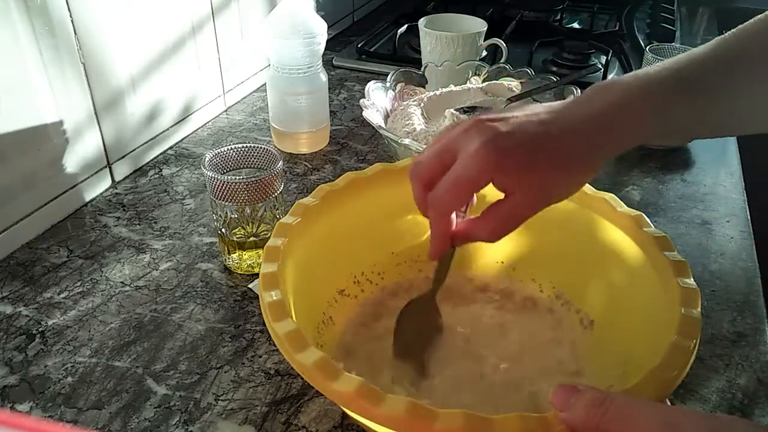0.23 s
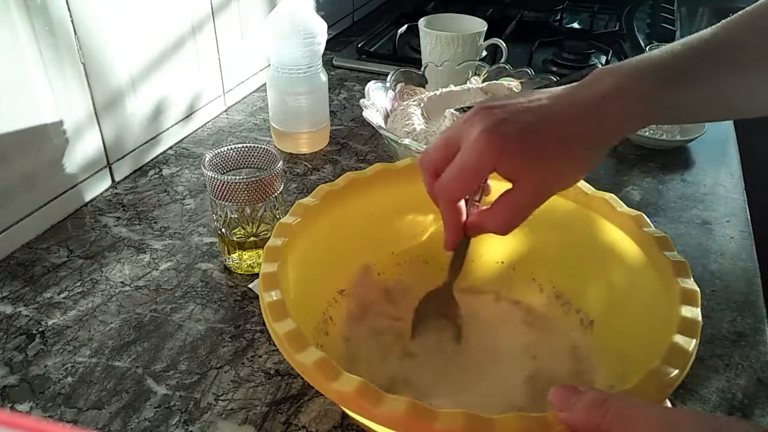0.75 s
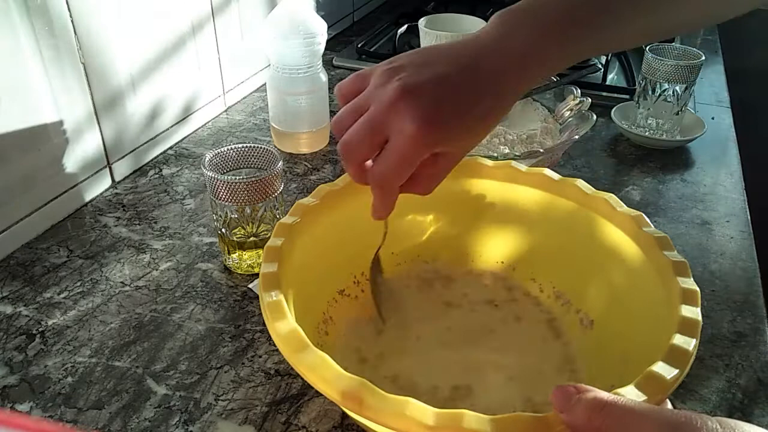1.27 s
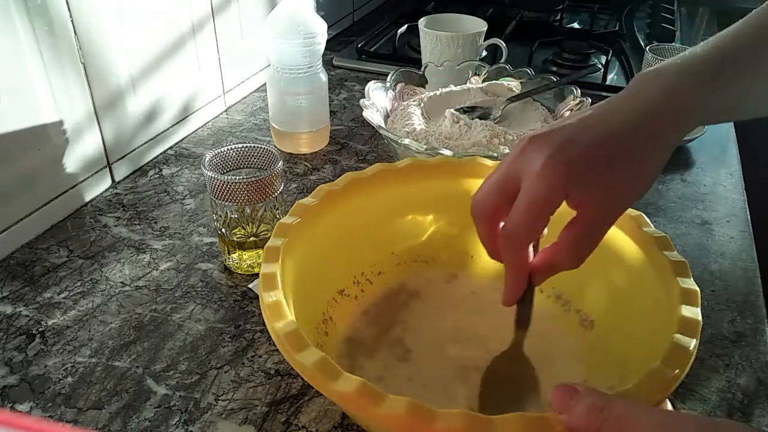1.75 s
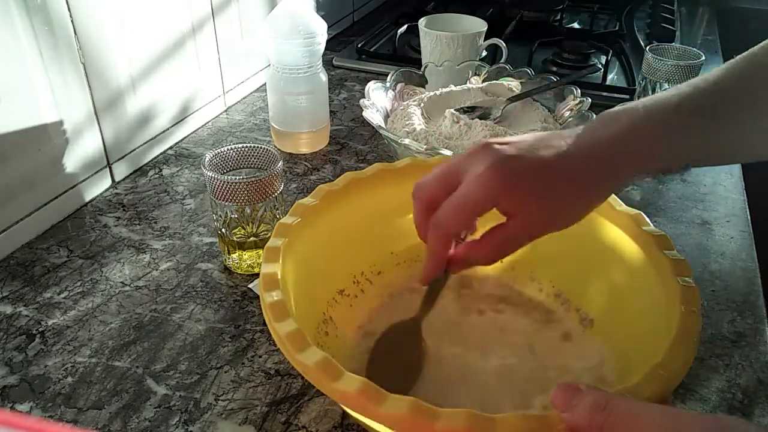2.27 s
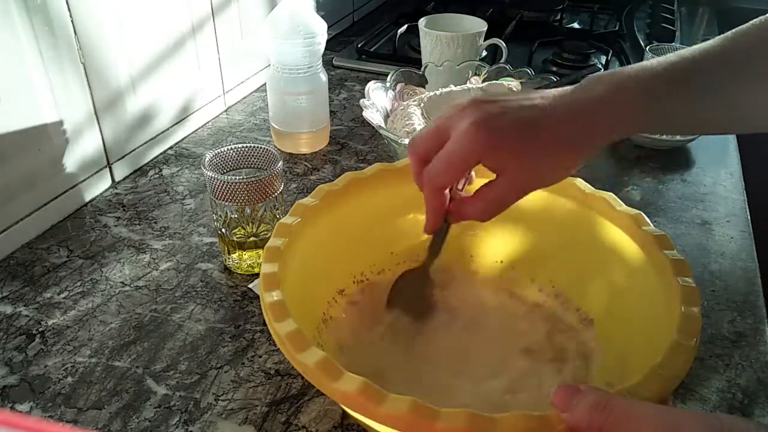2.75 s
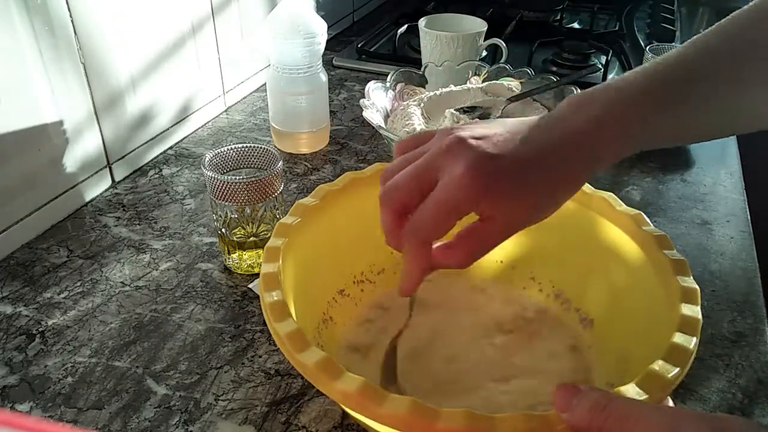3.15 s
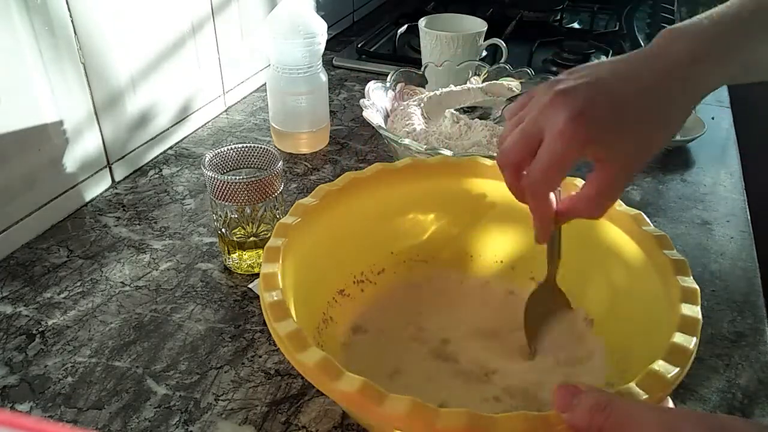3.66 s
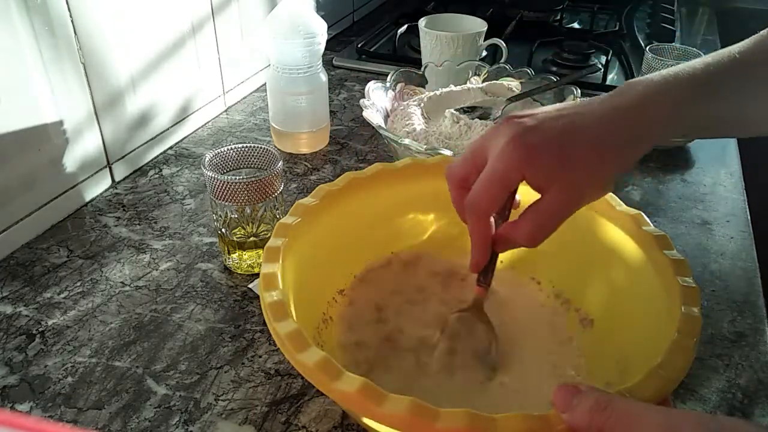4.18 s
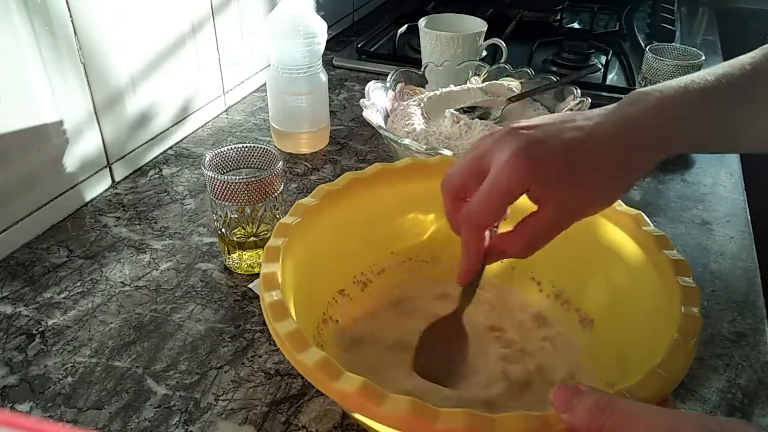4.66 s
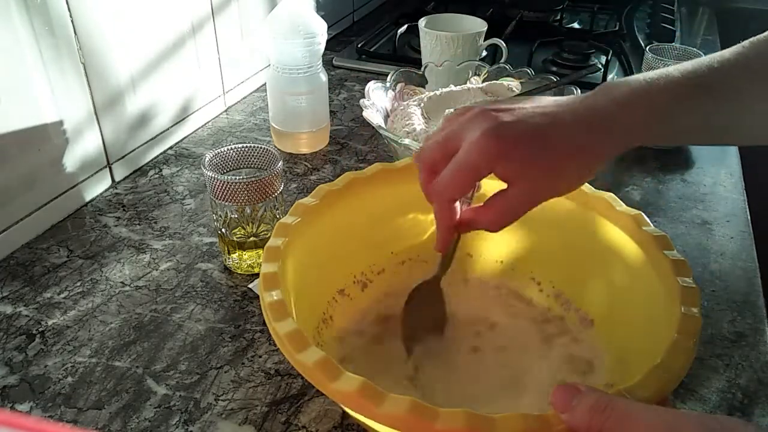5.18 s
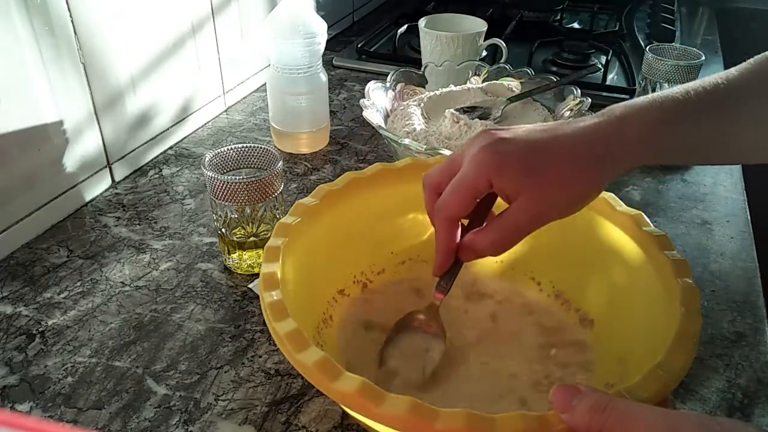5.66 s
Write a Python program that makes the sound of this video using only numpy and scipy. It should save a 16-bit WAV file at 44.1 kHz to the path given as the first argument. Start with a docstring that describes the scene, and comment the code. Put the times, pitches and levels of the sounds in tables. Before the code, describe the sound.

A metal spoon stirs thin batter in a plastic bowl on a stone counter. Gritty mid-pitched scrapes with hollow plastic knocks come first in brief strokes, then long sweeps, then shorter, choppier strokes. Short pauses separate them, with faint low bumps as the bowl rocks. Close single microphone in a small, hard, quiet kitchen.

```python
"""The scrape of a metal spoon round a plastic mixing bowl of batter on a stone kitchen counter.
Stick-slip grit drives the resonant modes of the wall, hisses at the spoon's edge and thuds on the counter.
Single catches ring the same modes freely; the bowl rocks with low rings that sag in pitch. A squeak, a singing
wall, hums, wet fizzes and a rumble are noise bands that swell or fade; the first three also glide in pitch.
The small hard kitchen draws each stroke out with sparse decaying taps over a quiet background."""
import sys
import numpy as np
from scipy import signal
from scipy.fft import rfft, irfft
from scipy.io import wavfile
from scipy.ndimage import uniform_filter1d

SR = 44100
rng = np.random.default_rng(int(sys.argv[2]) if len(sys.argv) > 2 else 0)


def store_pcm(level_fs):
    """Save levels as 16-bit WAV."""
    pcm = np.round(np.clip(level_fs, -1, 1) * 32767).astype(np.int16)
    wavfile.write(sys.argv[1], SR, np.atleast_2d(pcm).T)


N = 261072  # samples in the scene
USUAL_HZ, USUAL_DB = 1717, -41.5  # reference pitch and level of the scrape


def amp(db):
    """Level law: 20 dB is a tenfold amplitude."""
    return 10 ** (np.asarray(db) / 20)


def evened(x):
    """Normalisation to an rms of 1."""
    return x / np.sqrt(np.mean(x ** 2) + 1e-20)


def read(points, hz):
    """Interpolation of a spectrum along a logarithmic frequency axis."""
    f, value = np.transpose(points)
    return np.interp(np.log(hz + 1), np.log(f + 1), value)


def add(mix, s, sound):
    """Superposition: a sound joins the mix at s seconds, cut at the end of the scene."""
    part = mix[max(round(s * SR), 0):][:len(sound)]
    part += sound[:len(part)]


def resonate(x, hz, width):
    """Resonance by heterodyning, so its centre may move; white noise of rms 1 keeps rms 1."""
    turn = np.exp(2j * np.pi * np.cumsum(hz * np.ones(len(x))) / SR)
    r = np.exp(-np.pi * abs(width) / SR)
    shifted = x / turn + 1e-18
    envelope = signal.lfilter([np.sqrt(2 * (1 - r * r))], [1, -r], shifted)
    return (turn * envelope).real


def drift(seconds):
    """Slow random fluctuation of rms 1: white noise averaged twice over the given time."""
    size = max(int(seconds * SR), 2)
    return evened(uniform_filter1d(uniform_filter1d(rng.standard_normal(N), size), size))


def coloured(x, gain):
    """Linear filtering: the spectrum is multiplied by a gain given as a function of Hz."""
    return irfft(rfft(x) * gain(np.fft.rfftfreq(len(x), 1 / SR)), len(x))


def favoured(modes, centre_hz, octaves, others=0.36):
    """Modal excitation by a contact point: modes near centre_hz ring most; total power is 1."""
    hz, width, db = np.transpose(modes)[:, :, None]
    nearness = np.exp(-(np.log2(hz / centre_hz) / octaves) ** 2)
    share = amp(db) * np.sqrt(abs(width)) * (others + nearness)
    return share / np.linalg.norm(share, axis=0)


def whistle(rows, width):
    """Band-limited noise: two equal resonances in series, at a pitch and level that may move."""
    s, hz, db = np.transpose(rows)
    t = np.arange(s[0], s[-1], 1 / SR)
    f = np.interp(t, s, hz)
    tone = resonate(resonate(rng.standard_normal(len(t)), f, width), f, width)
    return s[0], amp(np.interp(t, s, db)) * evened(tone) * signal.windows.tukey(len(t), .1)


# as the spoon lifts off, the wall fades and the hiss fades faster
LIFT_S, LIFT_DB_PER_S, HISS_LIFT_DB_PER_S = 0.1, 328.5, 144  # the hiss rate adds to the wall's
# modes 800-1400 Hz re upper modes: they follow the lower modes in part and gain as the favoured pitch sinks
MIDDLE_DB, MIDDLE_FOLLOWS, MIDDLE_DB_PER_OCTAVE = -3.5, 0.17, -5.5
# the thud changes less than the scrape: its level at a scrape of USUAL_DB, and its share of any change
THUD_DB, THUD_FOLLOWS = -81.5, 0.56
# on landing, the scrape swells in while the low wall takes a short extra push
LAND_S, LAND_DB_PER_S, PUSH_DB, PUSH_S = 0.0066, 9000, 14, 0.0098
LOW_WALL_DB, LOW_WALL_FOLLOWS = -9, 1.16  # re upper modes, and its share of the lower modes' change
# Strokes of the spoon, one table each from landing to lift-off.
# Each row: time in seconds, upper wall modes in dB before the mix, favoured pitch in Hz,
# edge hiss in dB re upper modes, modes under 800 Hz in dB re upper modes.
STROKE_PATHS = [
    [(0.0, -44, 1810, -3, -16), (0.03, -52, 1960, -11.5, -3), (0.12, -59, 1770, 5.5, -20),
     (0.18, -62.5, 1800, -5.5, 0)],
    [(0.208, -53.5, 1690, -11.5, 4), (0.313, -37, 1753, -7, -11.5), (0.39, -56, 1800, -15.5, -11)],
    [(0.559, -49.5, 1620, -34, -3), (0.579, -61, 1700, -25.5, 2), (0.639, -41.5, 1620, -14.5, -11),
     (0.673, -37.5, 1640, -13, -26), (0.721, -44.5, 1790, -15, -11), (0.939, -36, 1890, -17.5, -15)],
    [(1.105, -37.5, 1720, -32, -12.5), (1.164, -74.5, 1780, 4, 7), (1.18, -49.5, 1640, -19.5, -16.5),
     (1.388, -41.5, 1750, -11, -5.5), (1.45, -41.5, 1800, -15.5, -25), (1.518, -48, 1790, -13, -11.5),
     (1.604, -40, 1830, -19, -12.5), (1.646, -46.5, 1830, -17.5, -28), (1.776, -39, 1610, -15, -19.5)],
    [(2.178, -44, 1716, -15, -12), (2.383, -45, 1940, -8, -6.5), (2.429, -41, 1780, -11.5, -17),
     (2.495, -46.5, 1670, -13, -2.5), (2.587, -35.5, 1830, -12, -8.5), (2.691, -45.5, 1640, -10, -4),
     (2.82, -38.5, 1950, -13, -12.5), (2.95, -59.5, 1630, -18, 2)],
    [(2.983, -38, 1550, -16.5, -11), (3.07, -45.5, 1510, -11.5, -6), (3.164, -57, 1620, -20, -9),
     (3.22, -63, 1860, -29, 1)],
    [(3.237, -44.5, 1610, -18.5, -5.5), (3.345, -53, 1720, -3.5, -17), (3.371, -40, 1720, -20, -17.5),
     (3.397, -50, 1610, -11.5, -6.5), (3.463, -54.5, 1590, -15.5, -2), (3.517, -38.5, 1730, -18.5, -8),
     (3.605, -42.5, 1710, -12, -10.5), (3.695, -48, 1840, -11.5, -10), (3.915, -45, 1640, -13.5, -7)],
    [(4.188, -44, 1630, -27, -28), (4.259, -43, 1550, -15.5, -0.5), (4.323, -55.5, 1410, -25, -21)],
    [(4.353, -54, 1660, -25, 11.5), (4.422, -47.5, 1640, -6.5, -10), (4.446, -40.5, 1760, -13, 1),
     (4.565, -43.5, 1770, -14, -10)],
    [(4.62, -48.5, 1720, -20, 4), (4.679, -34.5, 1680, -12, -17), (4.741, -38.5, 1680, -13.5, -9),
     (4.777, -39.5, 1610, -18, -6.5), (4.869, -42.5, 1620, -8, -11.5), (4.935, -44, 1696, -15, -9)],
    [(5.091, -42.5, 1460, -18, -3.5), (5.122, -49, 1500, -12, -6), (5.222, -39, 1800, -10.5, -6.5),
     (5.28, -43, 1800, -7.5, -10), (5.348, -54, 1800, -10, -5)],
    [(5.633, -71, 1630, -39, -4), (5.695, -49, 1600, -17, 7.5), (5.77, -64, 1620, -15, -6)],
]


def stroke_controls():
    """Quasi-static control: level and pitch glide along each stroke; other layers follow by rule."""
    t, out = np.arange(N) / SR, np.zeros((7, N))
    out[1] = USUAL_HZ
    for rows in STROKE_PATHS:
        s, *columns = np.transpose(rows)
        on = (t >= s[0] - LAND_S) & (t < s[-1] + LIFT_S)
        db, hz, hiss_db, lower_db = (np.interp(t[on], s, c) for c in columns)
        lifted_s = np.maximum(t[on] - s[-1], 0)
        db = db - LIFT_DB_PER_S * lifted_s
        hiss_db = hiss_db - HISS_LIFT_DB_PER_S * lifted_s
        push_db = PUSH_DB * np.exp(-abs(t[on] - s[0] + LAND_S) / PUSH_S)
        low_db = db + LOW_WALL_DB + LOW_WALL_FOLLOWS * lower_db + push_db
        db = db - LAND_DB_PER_S * np.maximum(s[0] - t[on], 0)
        middle_db = MIDDLE_DB + MIDDLE_FOLLOWS * lower_db + MIDDLE_DB_PER_OCTAVE * np.log2(hz / USUAL_HZ)
        thud_db = THUD_DB + THUD_FOLLOWS * (db - USUAL_DB)
        out[:, on] = (amp(db), hz, amp(db + hiss_db), amp(low_db), amp(thud_db),
                      amp(db + lower_db), amp(db + middle_db))
    return uniform_filter1d(out, 60, axis=1)


def grit(per_s, spread_db, clump_db, clump_s):
    """Stick-slip friction: random slips of uneven size that come in clumps."""
    sizes = amp(spread_db * np.minimum(rng.exponential(1, N), 4)) * rng.choice([-1, 1], N)
    slips = rng.random(N) < per_s / SR
    return evened(sizes * slips * amp(clump_db * drift(clump_s)))


# Spoon modes damped by hand and batter. Each row: pitch in Hz, width in Hz, level in dB over the hiss.
SPOON_MODES = [(3870, 200, 0), (4600, 110, 0.5), (5730, 450, 3.5), (9840, 500, 2)]
# Hiss of the edge. Each row: frequency in Hz, relative density in dB per Hz.
EDGE_SPECTRUM = [(1760, -11.5), (3000, -1.5), (4260, -6.5), (5840, -8), (7830, -10), (9530, -11.5),
                 (12000, -18.5), (13700, -16.5), (16000, -23)]


def edge_gain(hz):
    """Broadband friction spectrum with the spoon's damped resonances on top."""
    peaks_db = sum(db / (1 + (2 * (hz - f) / w) ** 2) for f, w, db in SPOON_MODES)
    return amp(read(EDGE_SPECTRUM, hz) + peaks_db)


# Modes of the bowl wall. Each row: pitch in Hz, width in Hz, relative level in dB.
WALL_MODES = [(450, 56, -24), (587.4, 38.7, 0), (746.5, 95, -3), (864, 56, -8.5), (1097, 52, 4.5),
              (1226, 68, -1.5), (1311, 53.5, 1), (1443, 70, 0), (1564, 96, 3.5), (1731, 93, 0.5),
              (1828, 74.6, 2), (1979, 75, 2.5), (2133, 78, 3.5), (2358, 560, -1), (2840, 79, -5.5),
              (2700, 250, -35.5)]
# Slow bending of the wall. Each row: pitch in Hz, width in Hz, relative level in dB.
BENDING_MODES = [(268.4, 20, -1), (330, 82, 3), (439, 77, 7.5)]
# Bowl on the counter. Each row: pitch in Hz, width in Hz, relative level in dB.
COUNTER_MODES = [(48, 20, -20.5), (94, 15.6, -11.5), (105, 22, -6.5)]


def scrape():
    """Forced vibration: one gritty force drives the wall and the counter and joins the hiss of the edge."""
    upper, centre_hz, hiss, low, thud, lower, middle = stroke_controls()
    force = grit(per_s=3000, spread_db=1.0, clump_db=2.5, clump_s=0.0081)
    out = np.zeros(N)
    for lo, hi, level in ((0, 800, lower), (800, 1400, middle), (1400, SR, upper)):
        modes = [m for m in WALL_MODES if lo <= m[0] < hi]
        share = favoured(modes, centre_hz[::64], octaves=0.26, others=0.48)
        for k, (hz, width, _) in enumerate(modes):
            # the moving contact crosses nodes of each mode, so every mode swells on its own
            reach = np.repeat(share[k], 64)[:N] * amp(4.7 * np.tanh(drift(0.036)))
            out += (-1) ** k * resonate(force * level * reach, hz, width)

    # the edge sings in a narrow wavering band where the slips lock to the wall
    edge_level = amp(-14.5 + 4.2 * drift(0.083)) * upper
    out += edge_level * resonate(force, centre_hz * (1 + 0.014 * drift(0.05)), 47)
    # the wall's ring carries little above about 3.3 kHz
    out = signal.sosfilt(signal.butter(2, 3300, fs=SR, output="sos"), out)

    for modes, level in ((BENDING_MODES, low), (COUNTER_MODES, thud)):
        share = favoured(modes, 300, octaves=8.8)[:, 0]
        for p, (hz, w, _) in zip(share, modes):
            ring = resonate(resonate(force * level, hz, w), hz, 1.35 * w)
            out += p * ring * np.sqrt(np.pi * 3.0 * w / SR)

    fine = 0.19 * force + 1.5 * grit(per_s=12000, spread_db=3.0, clump_db=1.37, clump_s=0.014)
    _, _, z = signal.stft(coloured(fine, edge_gain), SR, nperseg=256)
    # the colour of the rasp shifts as the edge tilts: patches about 1 kHz by 40 ms
    patches = evened(uniform_filter1d(uniform_filter1d(rng.standard_normal(z.shape), 6, axis=0), 14, axis=1))
    rasp = signal.istft(z * amp(1.96 * patches), SR, nperseg=256)[1][:N]
    return out + hiss * evened(rasp)


# Reverberation of the kitchen. Each row: frequency in Hz, decay by 60 dB in seconds.
ROOM_DECAY = [(100, 0.17), (700, 0.51), (1800, 0.29), (5000, 0.19), (12000, 0.37)]


def kitchen(x):
    """Reverberation by convolution: sparse taps of random sign, each band dying at its own speed."""
    taps = np.zeros(SR // 2)
    at = np.arange(200, len(taps) - 20, 20)
    taps[at + rng.integers(0, 20, len(at))] = rng.choice([-1., 1.], len(at))
    hz, t, z = signal.stft(taps, SR, nperseg=256)
    decay = amp(-60 * t / read(ROOM_DECAY, hz)[:, None])
    tail = signal.istft(z * decay, SR, nperseg=256)[1]
    return signal.fftconvolve(x, tail / np.linalg.norm(tail))[:N]


# Quiet kitchen. Each row: frequency in Hz, relative density in dB per Hz.
AIR_SPECTRUM = [(15, -13), (25, -19.5), (82, -13.5), (114, -13), (190, -23.5), (695, -19.5), (775, -17),
                (887, -16.5), (1290, -20), (3720, -33.5), (16000, -42.5)]


def air():
    """Stationary filtered noise: a steady background with a slight waver in level."""
    noise = coloured(rng.standard_normal(N), lambda hz: amp(read(AIR_SPECTRUM, hz)))
    return amp(-77 + 2.0 * drift(0.074)) * evened(noise)


# A low rumble swells and fades. Each row: time in seconds, level in dB.
RUMBLE_SWELL = [(0.0, -83), (0.6, -91), (1.3, -72), (1.6, -71), (2.1, -77.5), (2.65, -75), (3.17, -66),
                (3.56, -82), (4.3, -81), (5.03, -80), (5.92, -87)]


def rumble():
    """Narrow-band noise at a fixed low pitch of 48 Hz under a slow envelope."""
    out = np.zeros(N)
    add(out, *whistle([(s, 48, db) for s, db in RUMBLE_SWELL], width=27))
    return out


CONTACT_MS, SOFTER_LOW = 2.04, 0.43  # build-up of a catch at USUAL_HZ; power by which lower ones build slower
# Spoon catches the wall. Each row: time in seconds, peak in dB, favoured pitch in Hz, edge tick in dB re peak,
# thud in dB re peak; the sum below offsets the wall ring, tick and thud by a fixed trim each.
CATCHES = [(0.022, -35, 1880, -14, -21), (0.06, -38, 1880, -14, -21), (0.14, -46.5, 690, -4, -10),
           (0.211, -26.5, 720, -26, -33), (0.244, -38, 1700, -35, -39), (0.272, -24, 1710, -16, -49),
           (0.286, -24, 1740, -23, -43), (0.299, -29, 1880, -25, -48), (0.315, -23.5, 1900, -41, -50),
           (0.331, -26.5, 1770, -37, -41), (0.561, -35.5, 1194, -29, -25), (0.616, -32, 1670, -19.5, -33),
           (0.768, -23, 1760, -26, -37), (0.85, -30.5, 1670, -41, -35), (0.891, -28.5, 1980, -18, -54),
           (0.935, -27.5, 1740, -42, -49), (1.105, -33, 1130, -19.5, -17), (1.174, -35.5, 1890, -29, -41),
           (1.183, -29, 1645, -19, -44), (1.23, -39, 1760, -13, -38), (1.258, -34.5, 1380, -18, -19),
           (1.285, -26, 1780, -15.5, -23.5), (1.319, -29, 1570, -18.5, -28), (1.349, -29, 1670, -25, -22),
           (1.368, -30, 1080, -21, -15), (1.403, -27, 1710, -24, -47), (1.524, -36, 1100, -19, -12.5),
           (1.635, -30, 1180, -22, -22), (1.692, -32, 1120, -13, -47), (1.731, -50, 1810, -24, -47),
           (1.769, -38.5, 1670, -9.5, -33), (2.329, -30, 1770, -18, -35), (2.372, -29.5, 2440, -15.5, -25),
           (2.432, -24.5, 1650, -38, -34), (2.507, -29.5, 1590, -35, -44), (2.517, -27, 1320, -35, -35),
           (2.566, -27, 1830, -35, -43), (2.591, -18.5, 1640, -18.5, -58), (2.602, -24.5, 1470, -11.5, -61),
           (2.912, -31.5, 674, -22, -20), (2.965, -39, 580, -23, -46), (2.987, -20, 1450, -24, -48),
           (3.005, -29.5, 1970, -23, -21.5), (3.025, -22.5, 1280, -28, -42), (3.173, -43, 710, -14, -37),
           (3.186, -35, 700, -25, -41), (3.24, -26.5, 977, -22.5, -30), (3.359, -42, 1630, -32, -49),
           (3.373, -34, 1620, -11.5, -25.5), (3.489, -35, 1630, -30, -40), (3.509, -27, 1630, -21, -51),
           (3.518, -37, 1790, -16, -48), (3.564, -33.5, 1110, -18, -45), (3.585, -24, 890, -26, -53),
           (3.677, -27, 1840, -22.5, -29), (3.714, -31, 1920, -18.5, -23), (3.736, -31.5, 1160, -20, -19),
           (3.853, -29, 1850, -19, -21.5), (3.886, -32.5, 1190, -13, -25), (4.188, -27, 1750, -24, -20),
           (4.209, -35.5, 2030, -21, -10.5), (4.264, -31, 1260, -28, -23), (4.354, -33, 980, -27.5, -18),
           (4.458, -31.5, 1490, -15.5, -23), (4.622, -30.5, 1580, -26, -22), (4.655, -29, 1930, -30, -40),
           (4.682, -20, 1550, -19, -49), (4.703, -24, 1620, -29, -58), (4.712, -23.5, 1350, -20, -47),
           (4.871, -29.5, 1280, -28, -45), (4.92, -30, 1670, -31, -36), (5.092, -29, 1560, -23.5, -28),
           (5.112, -35, 1250, -20, -24), (5.201, -37, 546, -7, -41), (5.267, -26, 1170, -31, -42),
           (5.302, -30, 1900, -38, -23), (5.639, -36.5, 1680, -27, -19), (5.683, -23.5, 1530, -25.5, -17.5)]


def knocks():
    """Free vibration: each catch rings the wall modes, with a tick of the edge and a thud underneath."""
    out, t = np.zeros(N), np.arange(5000) / SR
    hz, width, _ = np.transpose(WALL_MODES)[:, :, None]
    luck = rng.standard_normal((len(CATCHES), 2, len(WALL_MODES), 1))
    ticks = rng.standard_normal((len(CATCHES), len(t)))
    for (s, db, centre_hz, tick_db, thud_db), (turn, bias), noise in zip(CATCHES, luck, ticks):
        rise_ms = CONTACT_MS * (USUAL_HZ / centre_hz) ** SOFTER_LOW
        rise = 1 - np.exp(-(1000 * t / rise_ms) ** 2)
        share = favoured(WALL_MODES, centre_hz, octaves=0.17, others=0.19) * amp(1.4 * np.tanh(bias))
        # the spoon stays pressed to the wall and damps it
        decay = np.exp(-np.pi * 1.8 * width * t)
        ring = rise * (share * decay * np.sin(2 * np.pi * hz * t + 1.08 * turn)).sum(0)
        tick = coloured(noise, edge_gain) * (1 - np.exp(-(t / 0.0011) ** 2)) * np.exp(-t / 0.0056)
        thud = rise * sum(amp(d) * np.exp(-np.pi * w * t) * np.sin(2 * np.pi * f * t)
                          for f, w, d in COUNTER_MODES + BENDING_MODES[:1])
        parts = ((ring, -1.5), (tick, tick_db + 4.5), (thud, thud_db - 1.5))
        add(out, s - .001, sum(amp(db + d) * p / abs(p).max() for p, d in parts))
    return out


# The spoon squeaks once. Each row: time in seconds, pitch in Hz before the strand's ratio,
# level in dB before the strand's own.
SQUEAK_GLIDE = [(.055, 3070, -66), (.064, 3170, -55), (.072, 3700, -49.5), (.09, 3850, -57),
                (.12, 4050, -54.5), (.14, 3700, -61)]


def squeak():
    """Parallel noise bands: three strands at fixed pitch ratios glide together."""
    out = np.zeros(N)
    for ratio, db in ((.82, -8), (1, 1.5), (1.17, -11)):
        start, sound = whistle(SQUEAK_GLIDE * np.array([1, ratio, 1]), width=270)
        add(out, start, amp(db) * sound)
    return out


# The bowl rocks and settles on the counter. Each row: start in seconds, start pitch in Hz, end pitch in Hz,
# level in dB before the onset, decay by 60 dB in seconds.
ROCKINGS = [(1.105, 135, 109, -47, 0.29), (3.241, 124, 104, -51, 0.16), (3.87, 125, 101, -61, 0.17),
            (4.191, 125, 100, -65, 0.18), (4.42, 99, 92, -59, 0.25), (5.09, 130, 110, -69, .15),
            (5.68, 120, 94, -66, 0.16)]


def booms():
    """Damped oscillation with falling frequency: a low ring that sags as the bowl comes to rest."""
    out, t = np.zeros(N), np.arange(SR // 4) / SR
    for s, start_hz, end_hz, db, t60 in ROCKINGS:
        hz = end_hz + (start_hz - end_hz) * np.exp(-t / 0.029)
        envelope = amp(db - 60 * t / t60) * (1 - np.exp(-t / 0.011))
        add(out, s, envelope * np.sin(2 * np.pi * np.cumsum(hz) / SR))
    return out


# Faint hums in the pauses, one table each. Each row: time in seconds, pitch in Hz, level in dB.
PAUSE_HUMS = [
    [(2.06, 765, -88), (2.09, 763, -83), (2.16, 765, -90)],
    [(4.1, 310, -88), (4.125, 310, -74), (4.175, 306, -64)],
    [(5.37, 700, -68), (5.39, 683, -62.5), (5.495, 692, -67.5), (5.51, 666, -77), (5.58, 673, -72)],
]


def hums():
    """Narrow-band noise, close to a tone, that glides in pitch and level."""
    out = np.zeros(N)
    for rows in PAUSE_HUMS:
        add(out, *whistle(rows, width=22))
    return out


# The wall sings. Each row: time in seconds, pitch in Hz, level in dB.
SINGING_WALL = [(3.36, 1660, -48), (3.39, 1600, -59), (3.42, 1590, -55), (3.46, 1596, -60),
                (3.5, 1640, -52)]


def singing():
    """Mode locking: the slips lock to one mode, heard as a single narrow gliding band."""
    out = np.zeros(N)
    add(out, *whistle(SINGING_WALL, width=40))
    return out


# Faint wet fizzes off the lifted spoon. Each row: start in seconds, length in seconds, pitch in Hz,
# width in Hz, starting level in dB.
WET_FIZZES = [(5.439, 0.061, 13500, 1500, -74), (5.441, .06, 9300, 4030, -78),
              (5.534, 0.032, 8250, 1536, -76.5)]


def fizzes():
    """Short bursts of high, broad noise at a fixed pitch, each falling 7.5 dB along its length."""
    out = np.zeros(N)
    for s, length, hz, width, db in WET_FIZZES:
        add(out, *whistle([(s, hz, db), (s + length, hz, db - 7.5)], width))
    return out


def scene():
    """Superposition of the bowl close by, its reverberation and the quiet of the kitchen."""
    bowl = amp(-1.5) * scrape() + knocks() + booms()
    small_sounds = rumble() + squeak() + hums() + singing() + fizzes()
    return (bowl + amp(-11.5) * kitchen(bowl) + small_sounds + air())[None]


def record(dry):
    """Linear filtering: bass roll-off, a duller top above 14.3 kHz, then the band limit."""
    thinned = signal.sosfilt(signal.butter(2, 44, "high", fs=SR, output="sos"), dry)
    duller = coloured(thinned[0], lambda hz: amp(-4.0 * (hz > 14300)))[None]
    band_limit = signal.firwin(511, 16050, window=("kaiser", 9), fs=SR)  # cutoff in Hz
    return signal.oaconvolve(duller, band_limit[None], "same")


dry = scene()
out = record(dry)
store_pcm(out)
```